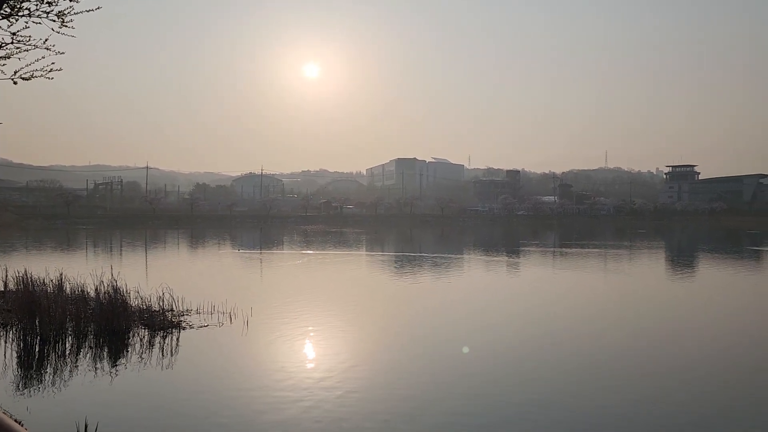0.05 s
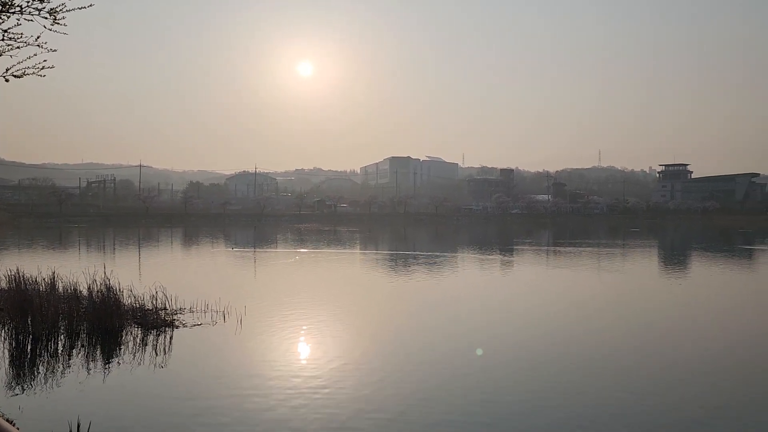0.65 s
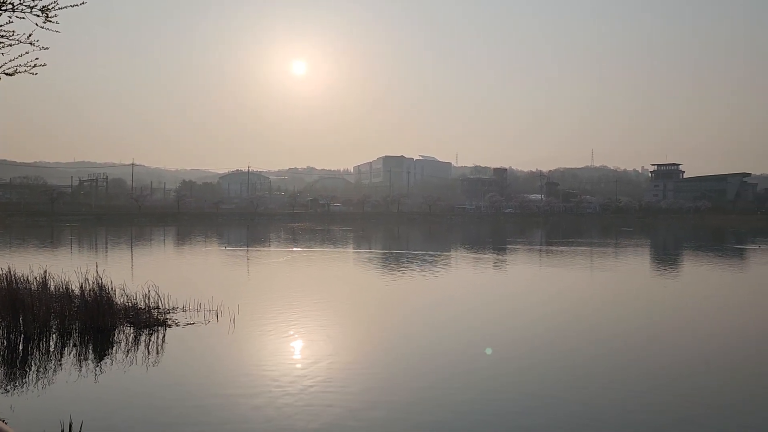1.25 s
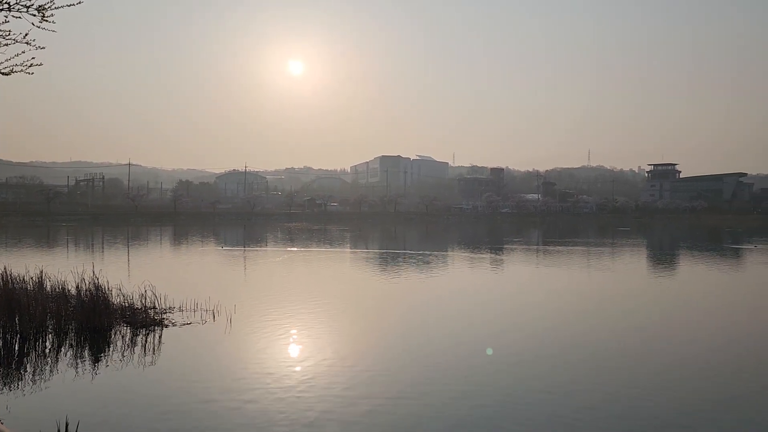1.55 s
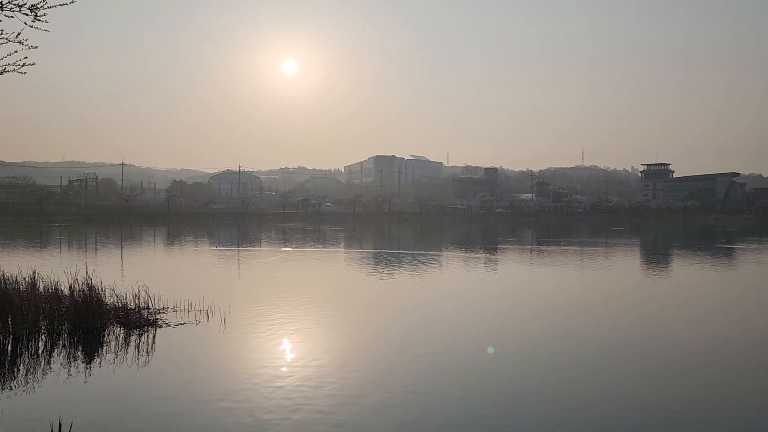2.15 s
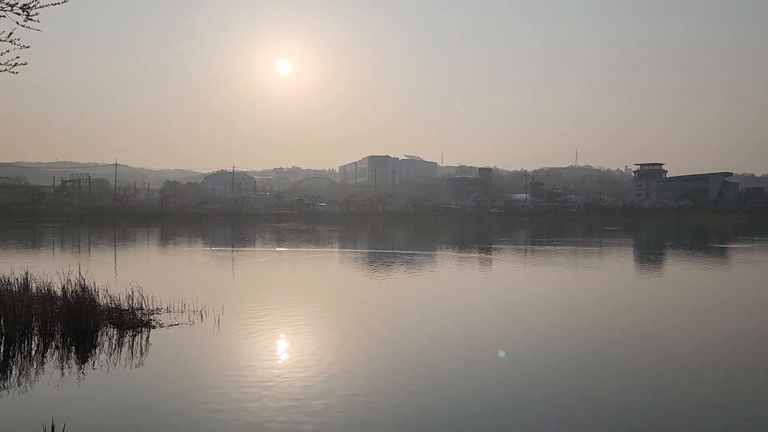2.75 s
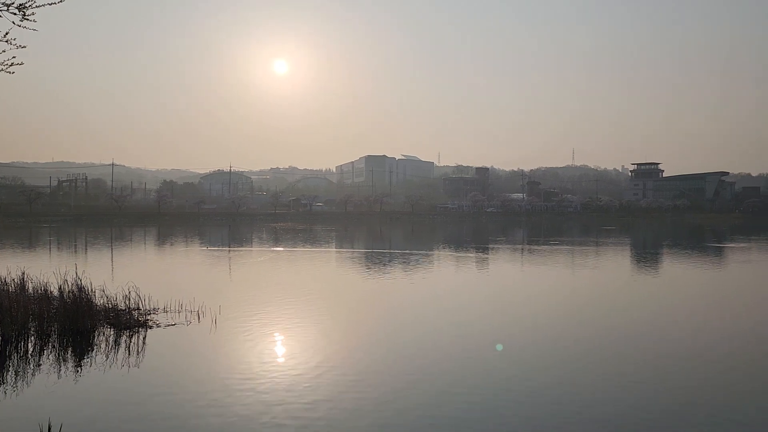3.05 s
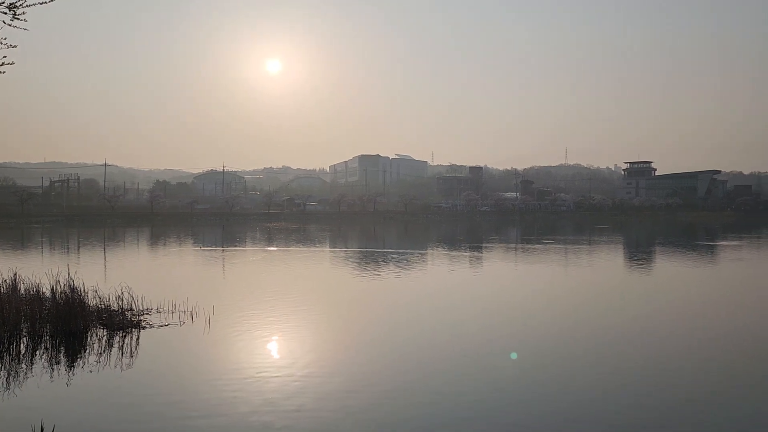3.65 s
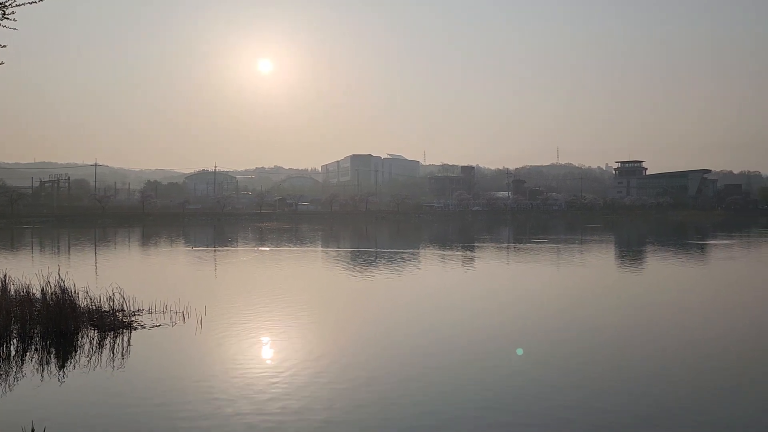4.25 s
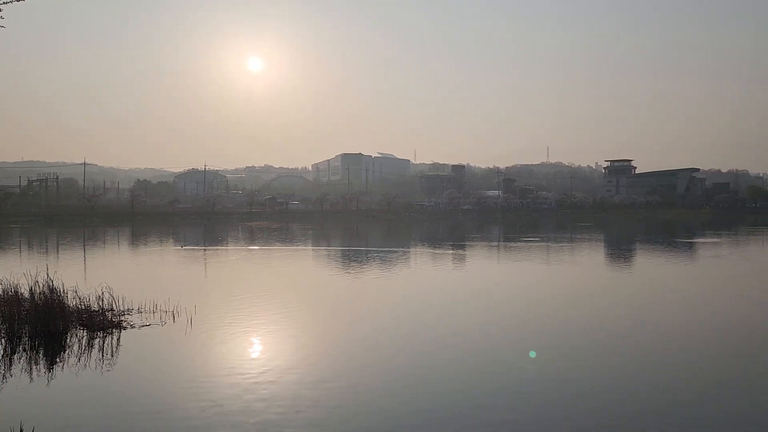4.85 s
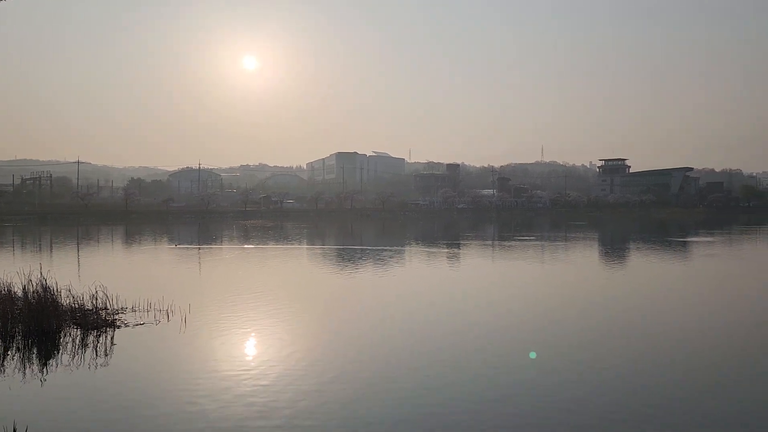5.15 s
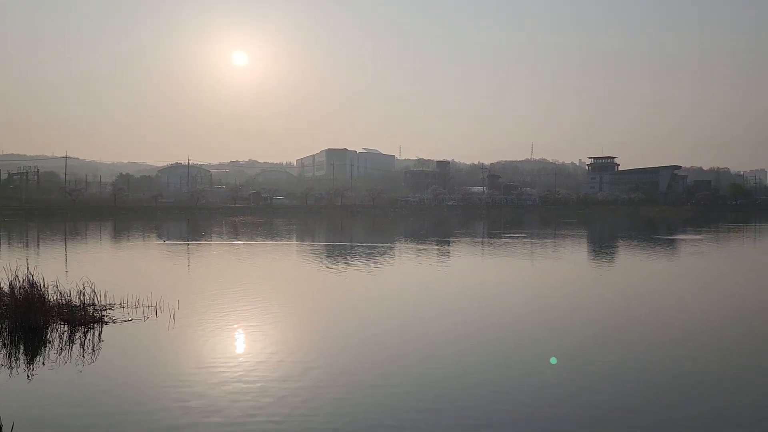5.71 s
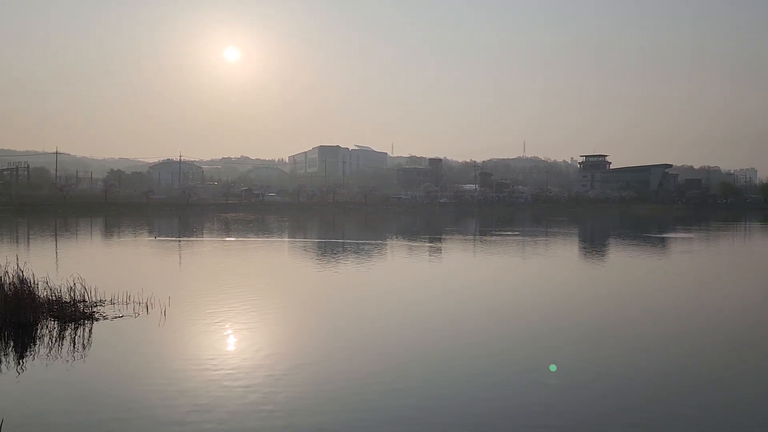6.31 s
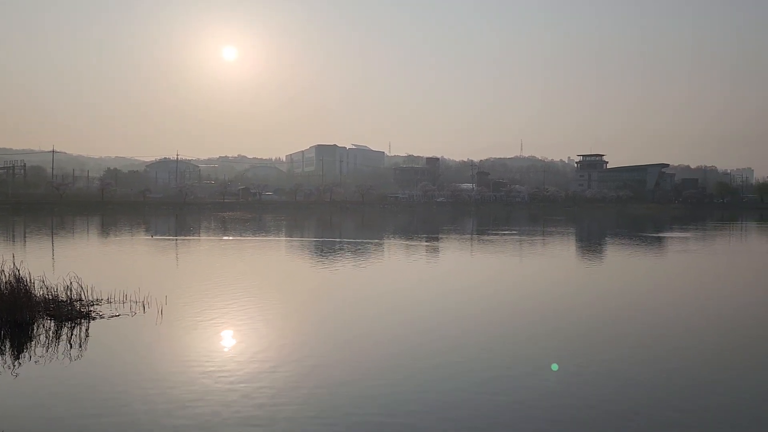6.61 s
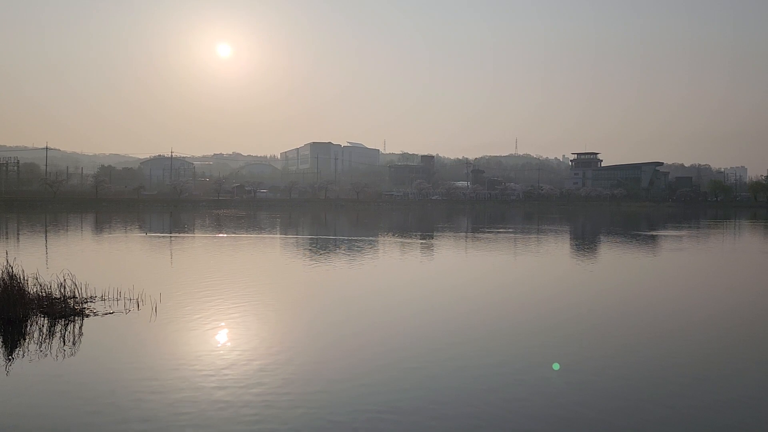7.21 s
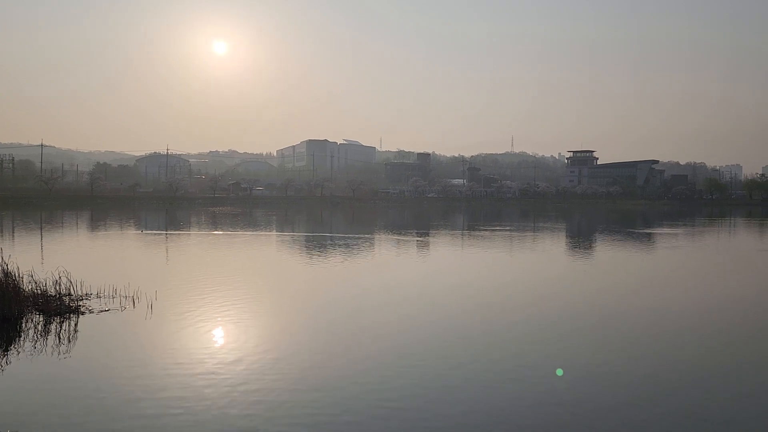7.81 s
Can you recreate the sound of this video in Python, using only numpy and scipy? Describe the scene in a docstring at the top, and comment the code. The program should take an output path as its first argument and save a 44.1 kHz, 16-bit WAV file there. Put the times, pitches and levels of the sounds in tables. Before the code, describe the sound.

Heard through a stereo microphone on a lake shore, far engines blur into a continuous low rumble that swells gently over soft tyre noise. Faint, brief bird chirps and a barely audible dry rustle come and go throughout. In the second half a distant lorry's low hum rises out of the traffic and fades, followed by a few more thin chirps.

```python
"""Shore of a calm lake, a stereo microphone facing far traffic across the water.
The engines blur into a steady rumble, coloured by one near reflection; a lorry briefly holds
a low note, and a soft wash of tyres comes from the left. Close to the microphone something dry
rustles faintly in bouts, with a few ticks. Small birds give thin chirps and a distant twitter.
Faint whines and the microphone's hiss lie underneath."""
import sys
import numpy as np
from scipy import signal
from scipy.fft import rfft, irfft, next_fast_len
from scipy.io import wavfile
from scipy.ndimage import uniform_filter1d

SR = 44100
rng = np.random.default_rng(int(sys.argv[2]) if len(sys.argv) > 2 else 0)


def file_out(sig):
    """Save sig as 16-bit WAV at sys.argv[1]."""
    # one column per channel
    cols = np.atleast_2d(sig).T
    # limit, then scale
    lim = np.clip(cols, -1, 1)
    pcm = np.round(lim * 32767).astype(np.int16)
    wavfile.write(sys.argv[1], SR, pcm)


N = 347067

# Far rumble, alike at both microphones and scattered round the shore: frequency_hz, relative_db
DIRECT_SPECTRUM = [(12, -26.5), (22, -16.5), (45, -3.5), (78, 0.5), (110, -5), (175, -5.5), (240, -8.5),
                   (320, -10.5), (420, -13.5), (520, -18), (680, -20), (820, -28.5), (1100, -47.5),
                   (2000, -100)]
SCATTER_SPECTRUM = [(12, -11.5), (45, 0.5), (78, 2), (160, -3.5), (300, 1), (600, 1), (800, -3.5),
                    (1100, -13.5), (2500, -79.5)]
# What a near surface throws back: frequency_hz, reflected_share
NEAR_REFLECTION = [(110, 0.08), (200, 0.09), (270, 0.59), (420, 0.58), (600, 0.17), (900, 0.3)]
# Heavy vehicles pulling and easing off: centre_s, half_length_s, exhaust_change_db, body_change_db
HEAVY_PULLS = [(.48, .3, 2.5, -0.7), (1.652, 0.39, 0.9, 2), (2.298, 0.29, 1, 1), (3.548, .2, -0.1, 1),
               (4.3, 0.35, .5, 1.2), (5.802, 0.18, 1.4, 2), (6.35, 0.27, 1, 1.4), (7.25, 0.38, 1.7, 0.7)]
# Single engines standing out for a moment: centre_s, level_db, half_length_s, pitch_hz
ENGINE_SWELLS = [(3.13, -46, 0.13, 486), (4.77, -45.5, 0.22, 462), (4.85, -41.5, 0.18, 333),
                 (5.68, -43, .1, 485), (6.3, -40, 0.14, 320)]
# A climbing lorry's exhaust note: time_s, level_db
LORRY_LEVEL = [(4.3, -64), (4.75, -42), (5.25, -40), (5.8, -41.5), (6.1, -58)]
# Tyre wash as the traffic slowly thins: time_s, relative_db
TRAFFIC_FLOW = [(0, -54), (1.0, -56), (2.35, -54), (3.4, -56.5), (4.85, -55), (5.4, -57), (6.8, -56),
                (7.87, -59)]
# Tyre wash at the left and right microphones: frequency_hz, relative_db
TYRE_LEFT_SPECTRUM = [(350, -38.5), (600, -5), (800, 1), (1000, -5), (1400, -5), (1650, -11), (2050, -14),
                      (2600, -21), (2900, -19), (3250, -28), (3500, -21), (3900, -34.5), (5000, -38.5),
                      (9000, -72)]
TYRE_RIGHT_SPECTRUM = [(350, -42.5), (600, -6), (800, 3.5), (1000, -3.5), (1400, -4.5), (1650, -7),
                       (2030, -4), (2350, -15.5), (2650, -21), (3000, -17.5), (3350, -30), (3750, -33.5),
                       (4800, -36), (9000, -67)]
# How alike the wash is at the two microphones: frequency_hz, coherence (0-1)
TYRE_COHERENCE = [(700, 0.58), (1100, 0.44), (1600, 0.48), (1950, .7), (2400, 0.16), (2900, 0.8),
                  (3300, 0.32), (6000, .15)]
# How much sooner the wash reaches the left microphone: frequency_hz, lead_s
TYRE_LEFT_LEAD = [(600, 0.0004), (870, 0.00055), (1450, 0.00036), (1750, 0.00056), (2500, 0.00052),
                  (2900, .00066), (4000, 0.00063)]
# Bouts of rustle and twitter on the shore: start_s, length_s, relative_db
SHORE_BOUTS = [(.32, 0.66, -75.5), (1.6, 0.53, -74), (2.218, 0.92, -75.5), (3.47, 0.51, -76.5),
               (4.15, 1, -75), (5.3, 0.24, -74.5), (5.932, 0.59, -75), (6.58, 1.04, -76)]
# The close, dry rustle: frequency_hz, relative_db
RUSTLE_SPECTRUM = [(2000, -39.5), (3700, -3.5), (4200, -2), (4800, 1.5), (5050, -5), (5400, -11),
                   (6200, -16), (7200, -21.5), (8200, -33.5), (10000, -49)]
# Dry ticks in the rustle: centre_s, level_db, half_length_s, pitch_hz
DRY_TICKS = [(1.722, -73, .01, 5200), (2.03, -77, .02, 5100), (2.982, -82, .004, 7100),
             (5.985, -88, 0.0041, 6800), (7.613, -81, .004, 7000)]
# Small birds: start_s, length_s, start_hz, middle_hz, end_hz, level_db, left_minus_right_db
BIRD_CHIRPS = [(.71, 0.15, 8750, 8650, 8400, -89, -3), (1.40, 0.083, 4760, 4730, 4760, -71.5, -9),
               (1.675, .07, 4760, 4830, 4780, -72, -7), (1.99, .07, 4740, 4720, 4680, -71, -8),
               (4.362, 0.12, 4900, 5040, 5040, -71, -8), (4.457, 0.096, 5280, 5370, 5300, -77, -10),
               (5.04, .05, 6100, 6080, 6060, -80, -7), (6.22, .09, 4980, 4860, 4850, -71, -9),
               (6.627, 0.087, 3270, 3300, 3420, -71, -8), (6.798, 0.1, 8650, 9000, 9050, -87, 3),
               (6.836, 0.049, 2920, 2960, 2870, -61.5, -3), (6.903, .1, 8200, 8030, 8200, -80, -11),
               (6.91, .095, 5360, 5390, 5470, -75.5, 3), (7.008, .05, 8500, 8620, 8650, -95, -4),
               (7.15, 0.055, 8450, 8200, 8170, -88, -7), (7.203, 0.036, 4920, 4900, 4850, -68, -9),
               (7.547, 0.062, 6500, 6520, 6600, -82, -7)]
# Thin whines: pitch_hz, level_db, waver_hz, left_minus_right_db
THIN_WHINES = [(1503, -72, 5, -2), (7713, -103, 12, 8), (8080, -112, 90, -10)]
# The microphone's own hiss: frequency_hz, relative_db
HISS_SPECTRUM = [(20, -0.5), (7000, -6), (10000, -3), (12000, 3), (16000, -1)]


def engines(echo_s=0.005985, scatter_db=-17, split_hz=130):
    """Engines across the lake blur into one rumble; a near surface's echo cuts regular notches in it."""
    direct = coloured(rng.standard_normal(N), DIRECT_SPECTRUM)
    echo = lambda hz: 1 + along(NEAR_REFLECTION, hz) * np.exp(-2j * np.pi * hz * echo_s)
    mid = unit(filtered(direct, echo))
    side = amp(scatter_db) * unit(coloured(rng.standard_normal(N), SCATTER_SPECTRUM))
    pair = np.array([mid + side, mid - side])
    # the deep exhaust throb comes and goes apart from the engines' body
    exhaust = filtered(pair, lambda hz: 1 / (1 + (hz / split_hz) ** 8))
    exhaust_db, body_db = engine_levels()
    rumble = amp(exhaust_db) * unit(exhaust) + amp(body_db) * unit(pair - exhaust)
    return rumble + bursts(ENGINE_SWELLS, width_hz=55)


def engine_levels(exhaust_db=-36.98, body_db=-37.98):
    """Exhaust and body levels leave their cruising values smoothly while a heavy vehicle pulls."""
    t = np.arange(N) / SR
    for centre_s, half_length_s, exhaust_change_db, body_change_db in HEAVY_PULLS:
        effort = np.exp(-((t - centre_s) / half_length_s) ** 2)
        exhaust_db = exhaust_db + exhaust_change_db * effort
        body_db = body_db + body_change_db * effort
    return exhaust_db, body_db


def lorry(firing_hz=80, waver_hz=1.1):
    """A far lorry climbs, and its exhaust note stands out of the rumble, dead centre."""
    pitch_hz = firing_hz + waver_hz * narrow_noise(0, width_hz=2.7)
    return amp(over_time(LORRY_LEVEL)) * unit(sine(pitch_hz))


def tyres(gain_db=7):
    """Tyre noise from the far road, dulled by distance, reaches the left microphone first."""
    road, diffuse = patchy_noise(depth_db=2.5), patchy_noise(depth_db=1.5)
    coherence = lambda hz: along(TYRE_COHERENCE, hz)
    delay = lambda hz: np.exp(-2j * np.pi * hz * along(TYRE_LEFT_LEAD, hz))
    right = filtered(road, lambda hz: coherence(hz) * delay(hz))
    right += filtered(diffuse, lambda hz: np.sqrt(1 - coherence(hz) ** 2))
    pair = np.array([coloured(road, TYRE_LEFT_SPECTRUM), coloured(right, TYRE_RIGHT_SPECTRUM)])
    return amp(over_time(TRAFFIC_FLOW) + gain_db) * unit(pair)


def rustle(shore_db, gain_db=1.3):
    """Something dry stirs close to the microphone, with a small tick now and then."""
    pair = np.array([patchy_noise(depth_db=0.5), patchy_noise(depth_db=5.5)])
    stir = amp(shore_db + gain_db) * unit(coloured(pair, RUSTLE_SPECTRUM))
    return panned(stir + bursts(DRY_TICKS, width_hz=900), balance_db=-3.5)


def woody_rustle(shore_db, gain_db=3):
    """The close rustle also carries a lower, woody hiss."""
    pair = np.array([narrow_noise(centre_hz=2840, width_hz=520) for _ in range(2)])
    return panned(amp(shore_db + gain_db) * pair, balance_db=-4)


def twitter(shore_db, note_db=-7.5, centre_hz=4680, spread=0.1, note_s=0.037, glide=0.016, count=320):
    """Far birds to the right scatter short, nearly level notes in a narrow range."""
    notes = np.zeros(N + SR)
    t = np.arange(SR // 4) / SR
    starts = rng.integers(0, N, count)
    for start, (height, strength, length, slope) in zip(starts, rng.standard_normal((count, 4))):
        progress = np.clip(t / (note_s * np.exp(length / 4)), 0, 1)
        pitch_hz = centre_hz * np.exp(spread * np.tanh(height) + glide * slope * progress)
        envelope = amp(note_db + 2 * strength) * np.sin(np.pi * progress)
        notes[start:start + len(t)] += envelope * sine(pitch_hz)
    return panned(amp(shore_db) * notes[:N], balance_db=-7.5)


def shore_level(lull_db=-81, attack_s=0.09, release_s=0.083, unrest_db=1.06, unrest_hz=9):
    """Level in dB shared by rustle and twitter: restless bouts rise, hold and sink back to a lull."""
    t = np.arange(N) / SR
    level_db = lull_db + unrest_db * narrow_noise(0, unrest_hz)
    for start_s, length_s, bout_db in SHORE_BOUTS:
        rise, fall = (t - start_s) / attack_s, (start_s + length_s - t) / release_s
        gate = np.clip(np.minimum(rise, fall) + 0.5, 0, 1)
        level_db += (bout_db - lull_db) * gate
    return level_db


def chirps(waver_hz=22):
    """Small birds whistle, mostly to the right; each thin note wavers and bends through three pitches."""
    out, t = np.zeros((2, N)), np.arange(N) / SR
    waver = waver_hz * narrow_noise(0, width_hz=430)
    for start_s, length_s, start_hz, middle_hz, end_hz, level_db, balance_db in BIRD_CHIRPS:
        progress = np.clip((t - start_s) / length_s, 0, 1)
        pitch_hz = np.interp(progress, [0, 0.5, 1], [start_hz, middle_hz, end_hz]) + waver
        whistle = np.sin(np.pi * progress) * sine(pitch_hz)
        out += panned(amp(level_db) * whistle, balance_db)
    return out


def whines(flutter_db=3):
    """Faint, thin tones, unsteady in pitch and level."""
    out = np.zeros((2, N))
    for pitch_hz, level_db, waver_hz, balance_db in THIN_WHINES:
        tone = sine(pitch_hz + waver_hz * narrow_noise(0, width_hz=32))
        flutter = amp(flutter_db * narrow_noise(0, width_hz=20))
        out += panned(amp(level_db) * unit(tone * flutter), balance_db)
    return out


def microphone_hiss(level_db=-96):
    """The microphone's own noise, independent in each channel."""
    return amp(level_db) * unit(coloured(rng.standard_normal((2, N)), HISS_SPECTRUM))


def patchy_noise(depth_db):
    """White noise whose narrow bands swell and fade on their own, as moving air makes them."""
    bands = signal.stft(rng.standard_normal(N), nperseg=1024)[2]
    patches = uniform_filter1d(rng.standard_normal(bands.shape), size=3, axis=0)  # across frequency
    patches = uniform_filter1d(patches, size=8, axis=1)  # across time
    return signal.istft(bands * amp(depth_db * unit(patches)), nperseg=1024)[1][:N]


def bursts(rows, width_hz):
    """Bands of noise that rise and fall, one for each row."""
    t = np.arange(N) / SR
    return sum(amp(level_db) * np.exp(-((t - centre_s) / half_length_s) ** 2) * narrow_noise(hz, width_hz)
               for centre_s, level_db, half_length_s, hz in rows)


def narrow_noise(centre_hz, width_hz):
    """A bell-shaped band of noise of rms 1; centred on 0 Hz, a random waver."""
    return unit(filtered(rng.standard_normal(N), lambda hz: np.exp(-((hz - centre_hz) / width_hz) ** 2)))


def sine(pitch_hz):
    """A tone that follows one pitch value per sample."""
    return np.sin(2 * np.pi * np.cumsum(pitch_hz) / SR)


def coloured(x, spectrum):
    """x shaped by (frequency_hz, relative_db) points."""
    return filtered(x, lambda hz: amp(along(spectrum, hz)))


def filtered(x, response):
    """x through a complex frequency response."""
    size = next_fast_len(N + SR // 2)
    return irfft(rfft(x, size) * response(np.fft.rfftfreq(size, 1 / SR)), size)[..., :N]


def along(points, hz):
    """(frequency_hz, value) points read on a log axis."""
    frequency_hz, values = np.transpose(points)
    return np.interp(np.log(hz + 1), np.log(frequency_hz + 1), values)


def over_time(points):
    """(time_s, value) points read at every sample."""
    return np.interp(np.arange(N) / SR, *np.transpose(points))


def panned(x, balance_db):
    """x in stereo, with the left side balance_db above the right."""
    return x * amp([[balance_db / 2], [-balance_db / 2]])


def amp(db):
    """Decibels to gain."""
    return 10 ** (np.asarray(db) / 20)


def unit(x):
    """Scaled to rms 1."""
    return x / np.sqrt(np.mean(x ** 2) + 1e-20)


def scene():
    """The far road and the near shore, as they meet at the microphone."""
    shore_db = shore_level()
    road = engines() + lorry() + tyres()
    shore = rustle(shore_db) + woody_rustle(shore_db) + twitter(shore_db) + chirps()
    return road + shore + microphone_hiss() + whines()


def record(dry, band_limit_hz=15700):
    """The recorder keeps nothing above its band limit."""
    return filtered(dry, lambda hz: hz < band_limit_hz)


dry = scene()
out = record(dry)
file_out(out)
```